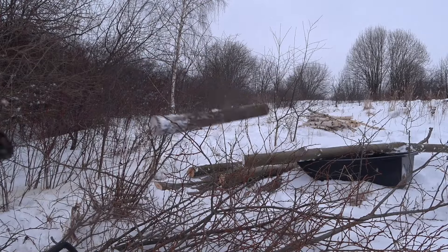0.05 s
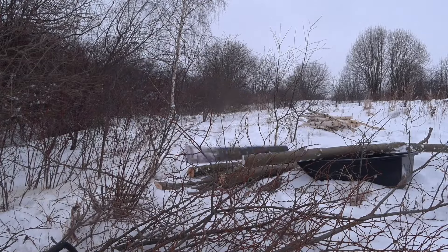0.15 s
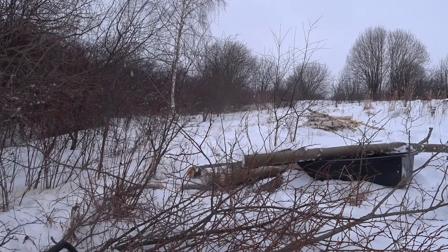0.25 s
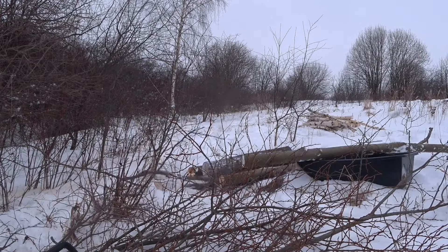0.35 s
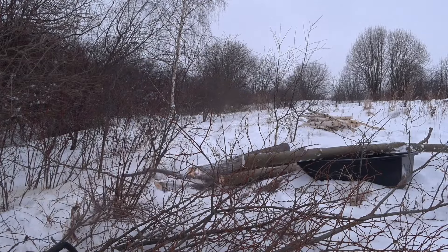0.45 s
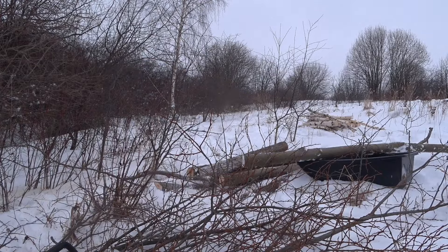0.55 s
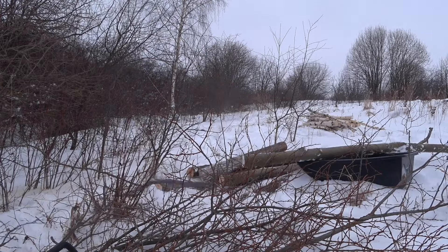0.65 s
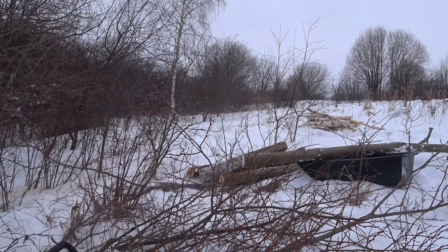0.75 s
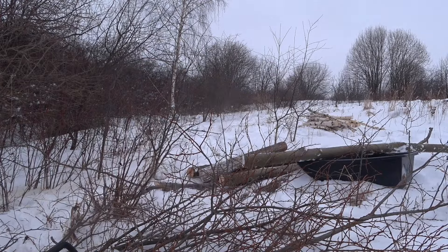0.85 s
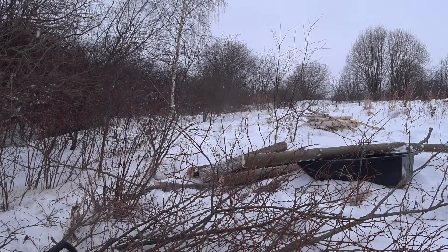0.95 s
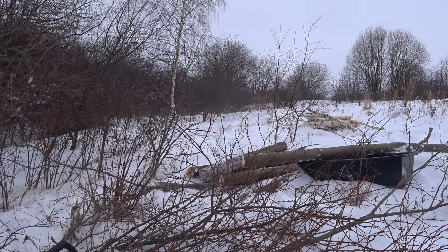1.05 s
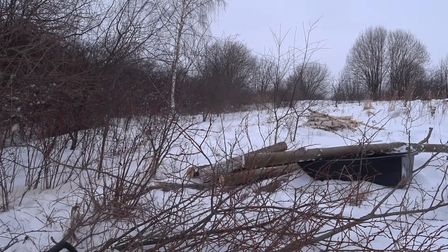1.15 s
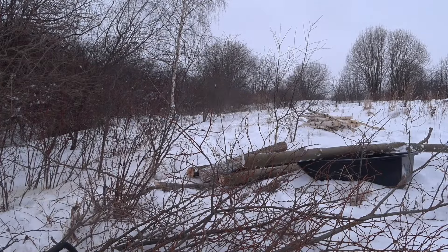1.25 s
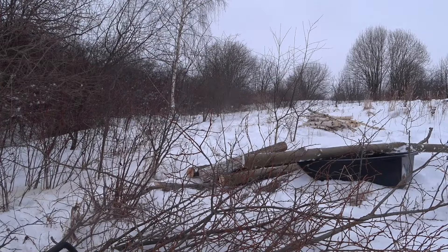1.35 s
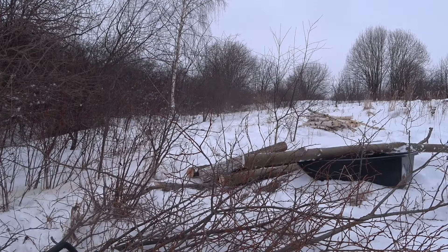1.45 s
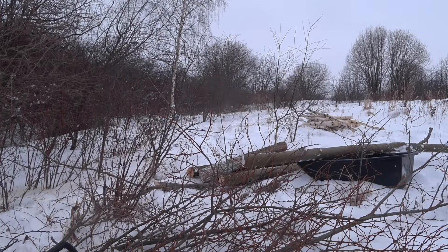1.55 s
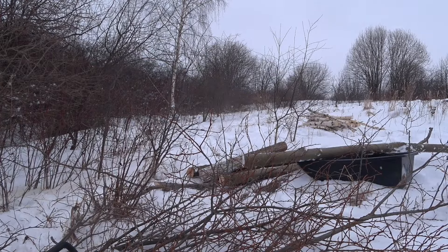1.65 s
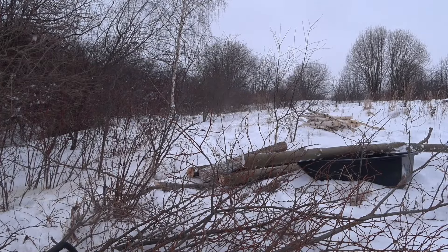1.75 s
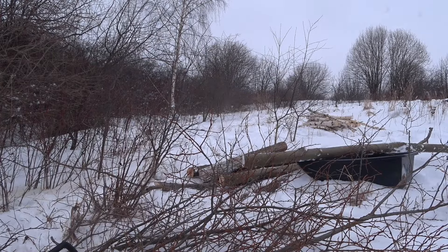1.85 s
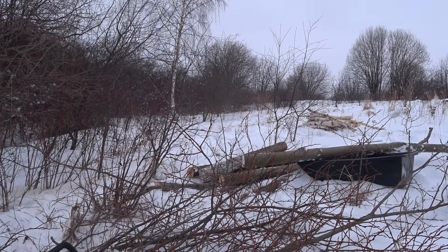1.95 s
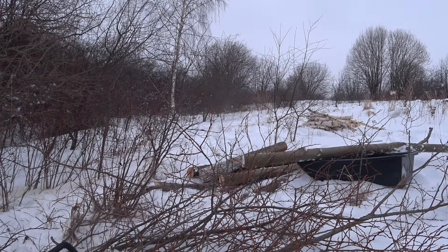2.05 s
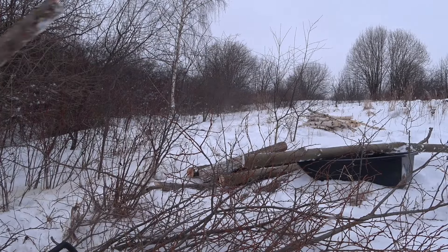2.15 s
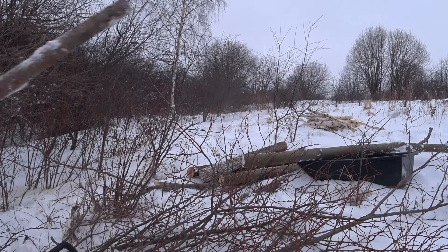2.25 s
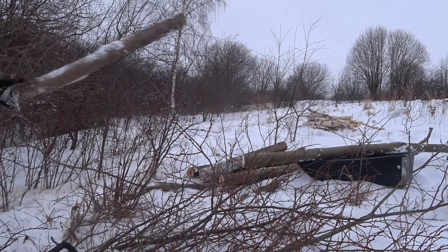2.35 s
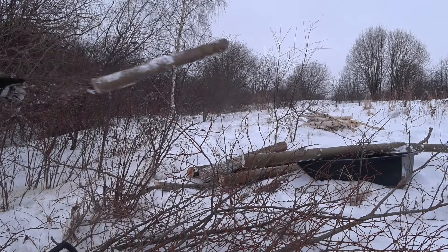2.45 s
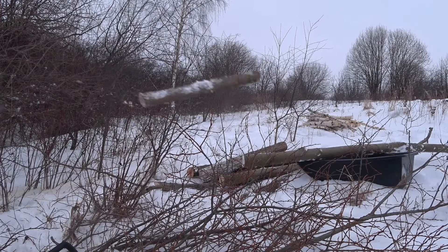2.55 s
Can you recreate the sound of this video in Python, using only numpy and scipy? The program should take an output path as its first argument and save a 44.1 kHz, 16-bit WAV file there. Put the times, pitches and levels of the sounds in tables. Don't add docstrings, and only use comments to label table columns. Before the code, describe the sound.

Sharp hollow double knock of a log landing on logs, followed by footstep crunches and coat rustle outdoors

```python
import sys
import numpy as np
from scipy import signal
from scipy.io import wavfile

SR = 44100
rng = np.random.default_rng(int(sys.argv[2]) if len(sys.argv) > 2 else 0)


def materialize(psi):
    bounded = np.clip(np.atleast_2d(psi).T, -1, 1)
    quanta = np.round(bounded * 32767).astype(np.int16)
    wavfile.write(sys.argv[1], SR, quanta)


def magnitude_from_level(level_db):
    exponent = np.asarray(level_db, float) / 20
    return 10 ** exponent


N = 114660
STACK_PAN_DB = -1.9


def rms_one(x):
    return x / np.sqrt(np.mean(x ** 2) + 1e-20)


def at_hz(points, hz):
    f_hz, values = np.transpose(points)
    return np.interp(np.log(hz), np.log(f_hz), values)


def panned(x, left_right_db):
    return x * magnitude_from_level(np.array([[left_right_db / 2], [-left_right_db / 2]]))


def stereo(mid, side, width_db):
    return mid + magnitude_from_level(width_db) * side * [[1], [-1]]


def near_stereo(mid, side):
    return stereo(mid, side, width_db=-16)


def drift(rate_hz):
    pole = np.exp(-80 * np.pi * rate_hz / SR)
    settle = 2000
    noise = rng.standard_normal(N // 40 + settle + 2)
    slow = rms_one(signal.lfilter([1], [1, -2 * pole, pole * pole], noise)[settle:])
    return np.interp(np.arange(N) / 40, np.arange(len(slow)), slow)


def filtered(x, order, hz, kind="band"):
    return signal.sosfilt(signal.butter(order, hz, kind, fs=SR, output="sos"), x)


def band(x, centre_hz, half_octaves):
    edges_hz = np.clip([centre_hz / 2 ** half_octaves, centre_hz * 2 ** half_octaves], 10, .45 * SR)
    return filtered(x, 1, edges_hz)


def banded_noise(spectrum, likeness, patchy_db):
    shared_swell = .3
    out, together = 0, drift(2.5)
    edges_hz = np.geomspace(30, 11800, num=25)
    white = rng.standard_normal((2, 2, N))
    for k, (low_hz, high_hz) in enumerate(zip(edges_hz, edges_hz[1:])):
        mid, side = filtered(white[k % 2], 2, [low_hz, high_hz])
        centre_hz = np.sqrt(low_hz * high_hz)
        alike = at_hz(likeness, centre_hz)
        flicker_db = patchy_db * (shared_swell * together + drift(5.2))
        gain = magnitude_from_level(at_hz(spectrum, centre_hz) + flicker_db)
        out = out + gain * (np.sqrt(1 + alike) * mid + np.sqrt(1 - alike) * side * [[1], [-1]])
    return rms_one(out)


def swells(rows, noise, half_octaves):
    out, t = np.zeros((2, N)), np.arange(N) / SR
    for middle_s, length_s, rms_db, hz, *pan_db in rows:
        start = max(int((middle_s - 1.2 * length_s) * SR), 0)
        near = slice(start, int((middle_s + 1.2 * length_s) * SR))
        shape = np.exp(-.5 * ((t[near] - middle_s) / (.4 * length_s)) ** 2)
        swell = shape * band(band(noise[:, near], hz, half_octaves), hz, half_octaves)
        swell = rms_one(swell) * np.sqrt(np.mean(shape ** 2))
        out[:, near] += panned(magnitude_from_level(rms_db) * swell, sum(pan_db))
    return out


def snaps(rows, pan_db):
    t60_s, click_db, length = .0035, 14, 600
    out, t = np.zeros((2, N + length)), np.arange(length) / SR
    noise = rng.standard_normal((len(rows), 2, length))
    noise[:, 0, 0] = -magnitude_from_level(click_db)
    for (s, peak_db, hz, half_octaves), burst in zip(rows, noise):
        half_octaves = max(half_octaves, .1)
        dying = burst * magnitude_from_level(-60 * t / t60_s)
        mid, side = band(band(dying, hz, half_octaves), hz, half_octaves)
        start = int(s * SR)
        out[:, start:start + length] += magnitude_from_level(peak_db) * near_stereo(mid, side) / np.abs(mid).max()
    return panned(out[:, :N], pan_db)


def field_hum():
    # f/Hz, level/dB per Hz
    hum_spectrum = [(30, -45), (150, -24), (330, -9.5), (700, -1.5), (1200, -9), (2000, -16), (5000, -27.5),
                    (11000, -26)]
    # f/Hz, likeness/1
    hum_likeness = [(60, 0.38), (220, 0.94), (700, 0.84), (1500, 0.057), (3100, 0.014), (11000, 0.23)]
    return magnitude_from_level(-54) * banded_noise(hum_spectrum, hum_likeness, patchy_db=.8)


def thumps():
    # middle t/s, length/s, rms level/dB,
    # centre f/Hz
    thump_rows = [(.11, 0.037, -67.5, 121), (.216, 0.014, -50, 230), (.225, 0.03, -60, 110),
                  (.28, 0.048, -69, 70), (.36, 0.029, -61.5, 103), (.45, 0.065, -72, 90),
                  (.52, 0.037, -62, 186), (.81, 0.017, -76, 50), (.876, 0.0093, -53, 280),
                  (.88, 0.011, -61.5, 120), (1.187, .012, -54, 500), (1.19, .025, -55, 210),
                  (1.36, 0.087, -83, 70), (1.29, .03, -66.5, 251), (1.82, .03, -81, 50),
                  (2.0, .05, -80, 70), (2.29, 0.089, -69, 112), (2.43, 0.1, -70, 71),
                  (2.15, 0.33, -57, 720), (2.455, 0.022, -61, 110), (2.49, 0.027, -56, 224),
                  (2.52, 0.016, -56, 130), (2.545, 0.023, -63, 110), (2.565, .014, -57, 120),
                  (2.583, 0.014, -54, 240), (2.597, .012, -56, 150), ]
    mid, side = rng.standard_normal((2, N))
    return swells(thump_rows, stereo(mid, side, width_db=-12), half_octaves=.65)


def grainy():
    grains_per_s, grain_share, spread_db, tilt = 4000, .4, 3, 0.13
    sizes = magnitude_from_level(spread_db * np.minimum(rng.exponential(1, (2, N)), 4))
    signs = rng.choice([-1, 1], (2, N))
    grains = rms_one(sizes * signs * (rng.random((2, N)) < grains_per_s / SR))
    mix = np.sqrt(grain_share) * grains + np.sqrt(1 - grain_share) * rng.standard_normal((2, N))
    return signal.lfilter([1], [1, -tilt], mix)


def rustle():
    # middle t/s, length/s, rms level/dB, centre f/Hz, left-right/dB
    rustle_rows = [(.025, 0.027, -61.5, 5230, 0), (.075, 0.1, -54, 9050, 1), (.14, 0.096, -62.5, 5170, 4),
                   (.31, 0.14, -50.5, 7000, 1), (.45, 0.15, -60.5, 5530, 0.5),
                   (.65, 0.029, -57.5, 3950, 2.5), (.688, 0.002, -45.5, 8100, -3),
                   (.714, 0.033, -47.5, 2300, -1), (.73, 0.099, -57, 4500, 5.5),
                   (.197, 0.0061, -57, 4000, -6), (.825, 0.052, -60.5, 5560, 5),
                   (.876, 0.015, -51.5, 2340, 6), (.90, 0.024, -64.5, 5000, 4),
                   (1.198, 0.013, -50, 6400, 17), (1.184, 0.0067, -44.5, 6000, 6),
                   (1.22, 0.039, -55.5, 6900, 8), (1.32, 0.059, -61.5, 3000, 6.5),
                   (1.53, 0.17, -63, 1620, 9.5), (1.76, 0.15, -73, 2060, 16),
                   (1.98, 0.072, -52.5, 4070, 5.5), (2.10, 0.13, -58, 2560, 7.5),
                   (2.27, 0.095, -56, 1350, 7), (2.39, 0.12, -60, 1230, 7.5), (2.48, 0.073, -53, 2480, 6),
                   (2.57, 0.1, -63, 7000, -3)]
    return swells(rustle_rows, near_stereo(*grainy()), half_octaves=1.58) * magnitude_from_level(1.73 * drift(110))


def underfoot():
    # t/s, peak level/dB, centre f/Hz, half width/octaves
    snap_rows = [(.8070, -23, 8400, 0.58), (.8073, -30, 3100, 0.29), (.8077, -30.5, 5800, 0.095),
                 (.8078, -28, 9600, 0.43), (.8079, -36, 1200, 0.32), (.8487, -44, 8000, .7),
                 (.8745, -36, 1080, 0.62), (.8765, -44, 6500, 0.42), (.8778, -35.5, 1500, 0.79),
                 (1.033, -43.5, 3000, .9), (1.042, -41.5, 1970, 0.65), (.943, -49, 7540, 0.83),
                 (1.122, -48, 7500, .7), (1.180, -40, 2510, .4), (1.1803, -33, 7500, .3),
                 (1.1813, -28, 5000, 0.72), (1.1855, -30, 1400, 1.1), (1.1858, -35, 9000, .7),
                 (1.188, -38, 7500, .2), (1.1937, -35, 2500, .35), (1.1975, -42, 6500, .3),
                 (1.2, -44, 2500, .25), (1.203, -40, 7200, .3), (1.2055, -23, 8000, .9),
                 (1.2064, -22, 6800, .9), (1.2072, -48, 1080, 0.28), (1.2232, -32.5, 7100, 0.28),
                 (1.2236, -43, 2220, 0.44), (1.227, -52, 850, 0.42), (1.2357, -39, 6830, 0.4),
                 (1.2905, -38.5, 720, 0.29), (2.385, -50, 3000, 0.98), (2.570, -33, 9050, 0.73)]
    return snaps(snap_rows, pan_db=6)


def snow_spray():
    # f/Hz, level/dB per Hz
    spray_spectrum = [(880, 3), (1500, 0), (2630, -3), (4140, -6.5), (9780, -5.5), (11100, -6),
                      (11500, -64), (15000, -72), (22000, -120)]
    # f/Hz, likeness/1
    spray_likeness = [(1000, 0.71), (11000, 0.71)]
    start_s, hold_s = .2, 0.025
    burst_db, burst_t60_s = -34, 0.21
    fall_db, fall_t60_s = -49, 1.96
    t = np.arange(N) / SR - start_s
    after = np.maximum(t - hold_s, 0)
    burst = magnitude_from_level(burst_db - 60 * after / burst_t60_s)
    fall = magnitude_from_level(fall_db - 60 * after / fall_t60_s)
    noise = banded_noise(spray_spectrum, spray_likeness, patchy_db=-1.0)
    snow = (t > 0) * (burst + fall) * magnitude_from_level(3.2 * drift(72)) * noise
    return panned(filtered(snow, 3, 600, "high"), STACK_PAN_DB)


def bark_cracks():
    # t/s, peak level/dB, centre f/Hz, half width/octaves
    crack_rows = [(.098, -40, 7500, 0.79), (.106, -32.5, 8150, 0.54), (.114, -58, 4500, .9),
                  (.1285, -35.5, 4300, 0.87), (.147, -34, 7000, 1.1), (.1992, -26, 8000, 0.81),
                  (.2005, -15.5, 6800, 0.83), (.2030, -22.5, 3000, 0.68), (.2032, -22, 9900, .3),
                  (.2088, -34, 6000, 0.33), (.215, -33, 4200, 0.15), (.218, -30, 4100, 0.13),
                  (.2187, -43, 9200, 0.14), (.2212, -13.5, 1990, 1.02), (.2258, -16.5, 8300, 0.72),
                  (.2277, -23, 3000, 0.37), (.2283, -16, 6700, 0.13), (.2292, -21, 9700, 0.13),
                  (.2308, -17, 6200, 0.57), (.2323, -12, 6800, 0.52), (.2385, -40, 6740, 0.2),
                  (.2475, -34, 7000, .4), (.252, -24, 8650, .9), (.256, -19, 9000, 0.99),
                  (.382, -27, 6500, .9), (.31, -34, 8000, .7), (.445, -38, 8000, .7), (.593, -47, 7500, .6),
                  (.425, -47, 5000, .9), (.468, -47, 4080, 1)]
    return snaps(crack_rows, STACK_PAN_DB)


def logs():
    # t/s, peak level/dB, centre f of the struck colour/Hz, narrowness/dB per octave squared
    contacts = [(.197, -40, 800, 15), (.2030, -9, 1580, 25), (.2033, -16.5, 1020, 64),
                (0.2040, -2.5, 530, 68), (.2043, -11.5, 1000, 60), (0.2057, -5.5, 585, 47),
                (0.206, -6.5, 960, 76), (0.2059, -13.5, 1500, 65), (.207, -19, 296, 60),
                (.2104, -18, 296, 60), (.210, -4, 720, 84), (.2165, -14.5, 745, 55),
                (.2210, -7.5, 1600, 11), (.2213, -23.5, 760, 69), (0.2258, -13, 940, 34),
                (0.228, -10, 1920, 18), (0.2293, -8.5, 1130, 59), (0.2323, -7, 1210, 50),
                (.2345, -16.5, 1150, 47), (0.2373, -17, 1150, 53), (0.2412, -20.5, 670, 63),
                (.253, -28, 750, 42), (.260, -28, 754, 40), (0.267, -29, 1320, 30), (.270, -27.5, 720, 50),
                (0.3218, -35.5, 700, 23), (.3217, -25.5, 590, 200), (.340, -34, 590, 200)]
    # f/Hz, level/dB, t60/s
    wood_modes = [(296, -3.5, 0.25), (540, -6.5, 0.029), (590, -6, .12), (643, -4, 0.065), (718, -2, 0.085),
                  (902, -5.5, 0.054), (986, 2.5, 0.025), (1077, -5.5, 0.039), (1193, -1, 0.03),
                  (1300, -10, 0.046), (1500, 2.5, 0.019), (1590, -21, 0.03), (2000, -1.5, 0.021),
                  (2660, -15, 0.017)]
    wood_db, strike_spread_db = -13, 1.5
    s, peak_db, centre_hz, narrow = np.transpose(contacts)
    start = (s * SR).astype(int)
    out = np.zeros((2, SR))
    luck = rng.standard_normal((len(s), 2, len(wood_modes)))
    for k, (hz, mode_db, t60_s) in enumerate(wood_modes):
        colour_db = -narrow * np.log2(hz / centre_hz) ** 2
        height = -magnitude_from_level(peak_db + mode_db + wood_db + colour_db + strike_spread_db * luck[:, 0, k])
        clicks = np.zeros((2, SR)) + 1e-18
        clicks[:, start] = height * [np.ones(len(s)), luck[:, 1, k]]
        decay, turn = magnitude_from_level(-60 / (t60_s * SR)), 2 * np.pi * hz / SR
        out += signal.lfilter([0, np.sin(turn)], [1, -2 * decay * np.cos(turn), decay ** 2], clicks)
    mid, side = filtered(out, 3, [290, 3000])
    knock = stereo(mid, side, width_db=-8.5)
    return panned(np.pad(knock, ((0, 0), (0, N - SR))), STACK_PAN_DB)


def scene():
    return field_hum() + thumps() + rustle() + underfoot() + snow_spray() + bark_cracks() + logs()


def band_limit(x):
    return signal.sosfilt(signal.butter(12, 12270, fs=SR, output="sos"), x)


def record(dry):
    dip_s, dip_length_s, dip_db = 1.832, 0.0072, -21
    t = np.arange(N) / SR
    dip = magnitude_from_level(dip_db * np.exp(-.5 * ((t - dip_s) / (0.27 * dip_length_s)) ** 2))
    top_cut = signal.ellip(10, .5, 50, 11100, fs=SR, output="sos")
    return band_limit(signal.sosfilt(top_cut, dry * dip))


dry = scene()
out = record(dry)
materialize(out)
```